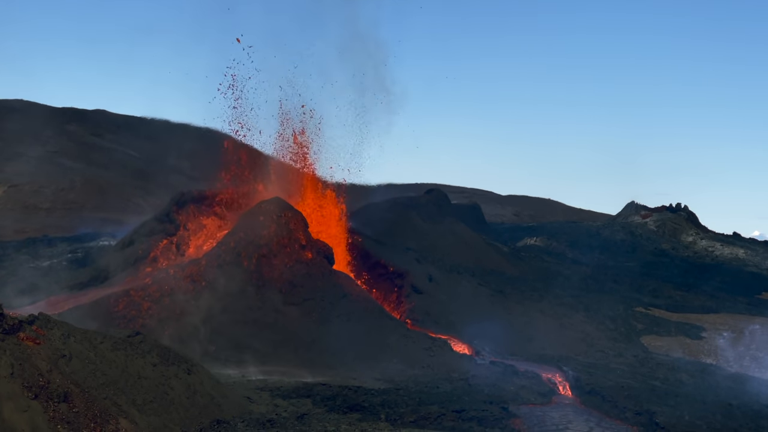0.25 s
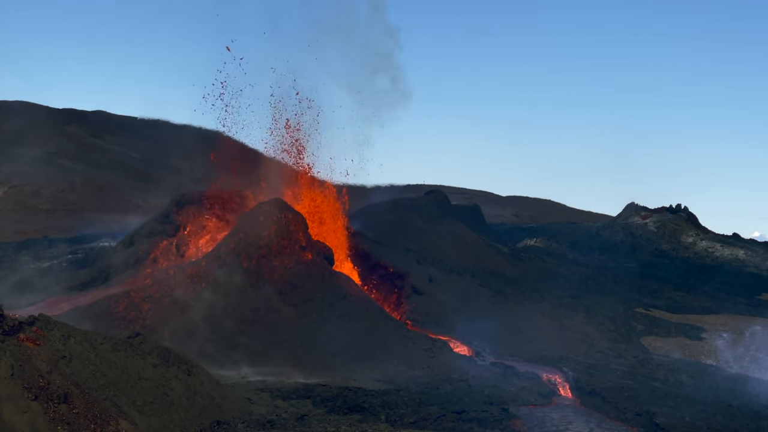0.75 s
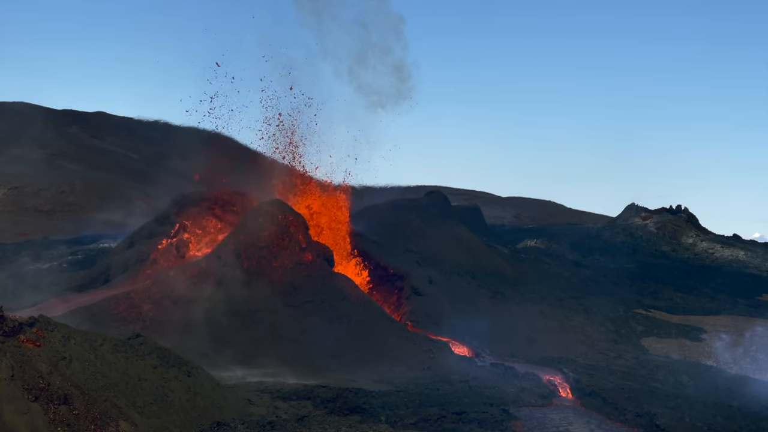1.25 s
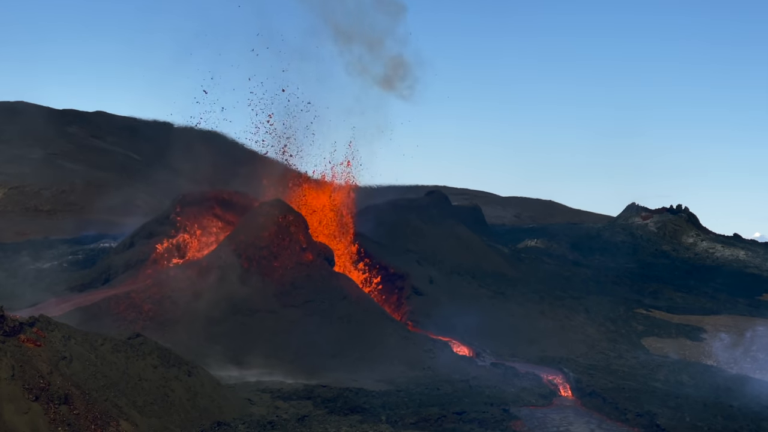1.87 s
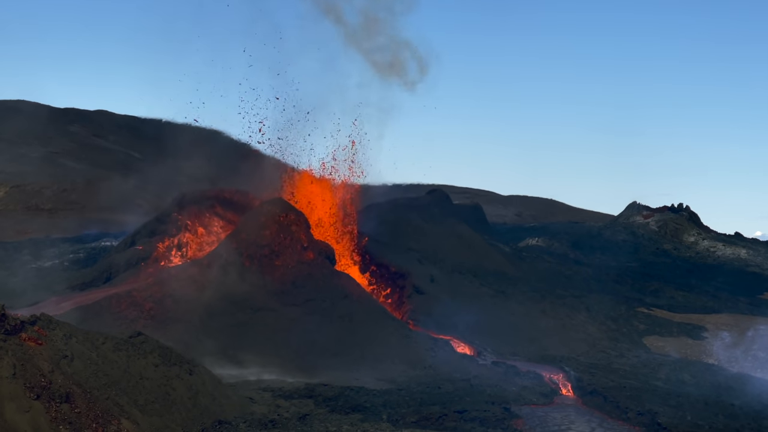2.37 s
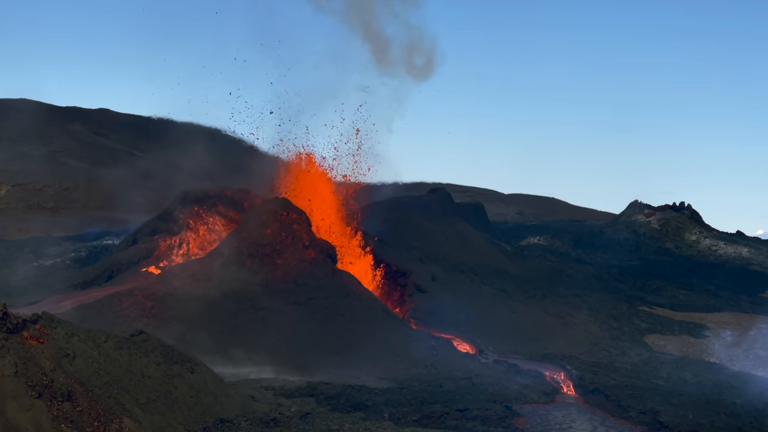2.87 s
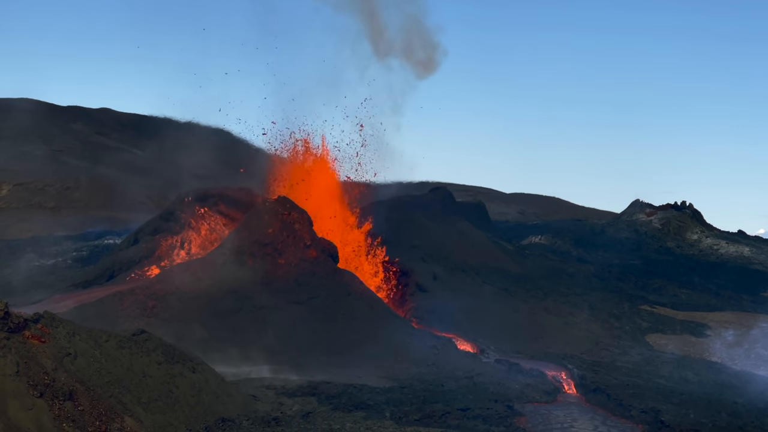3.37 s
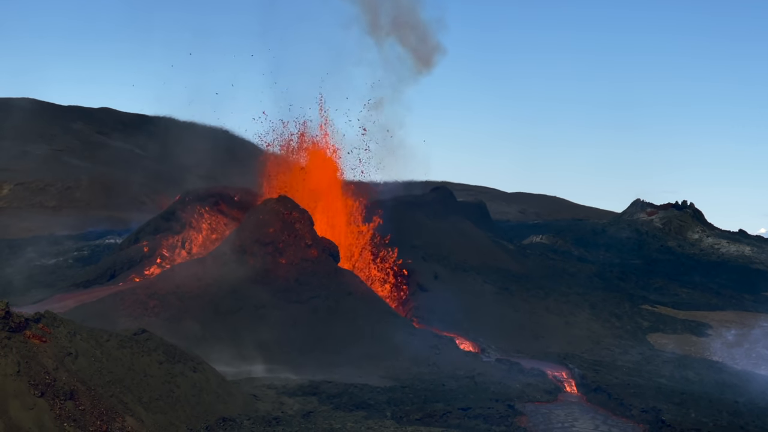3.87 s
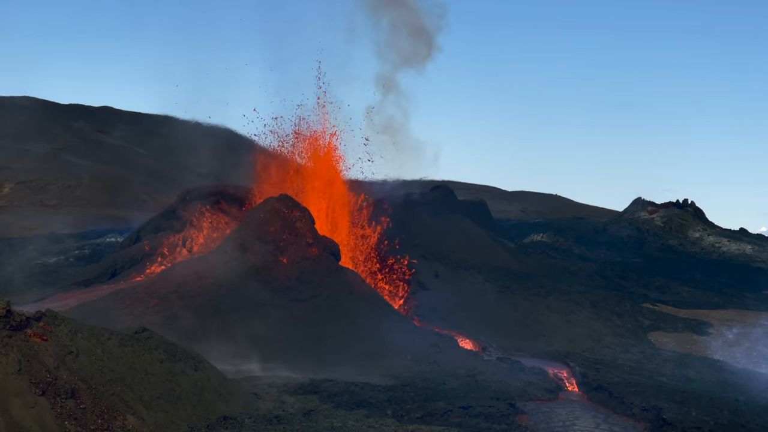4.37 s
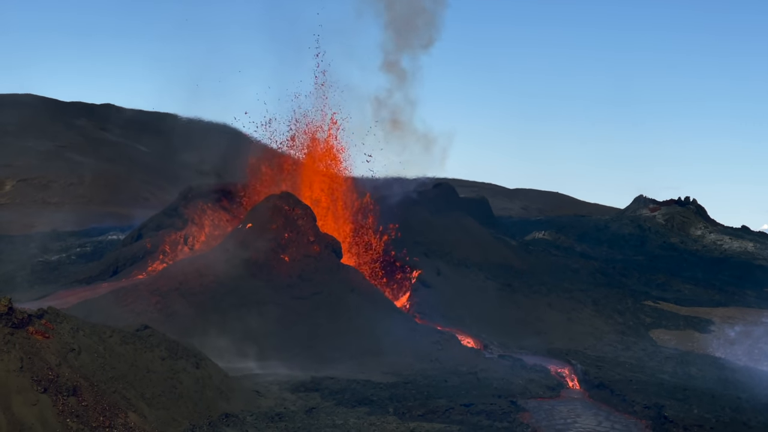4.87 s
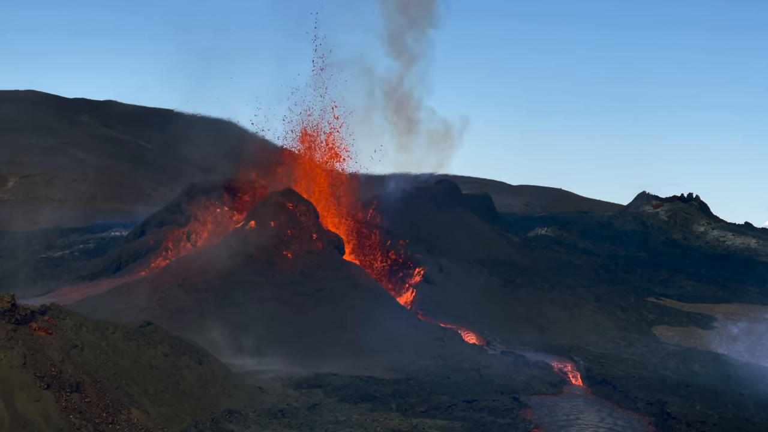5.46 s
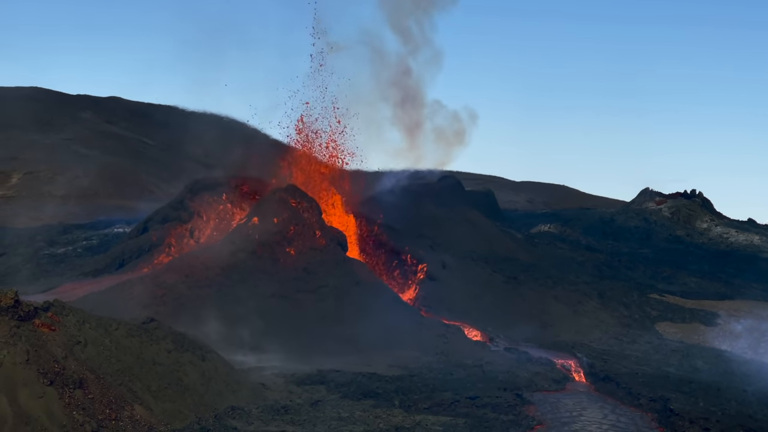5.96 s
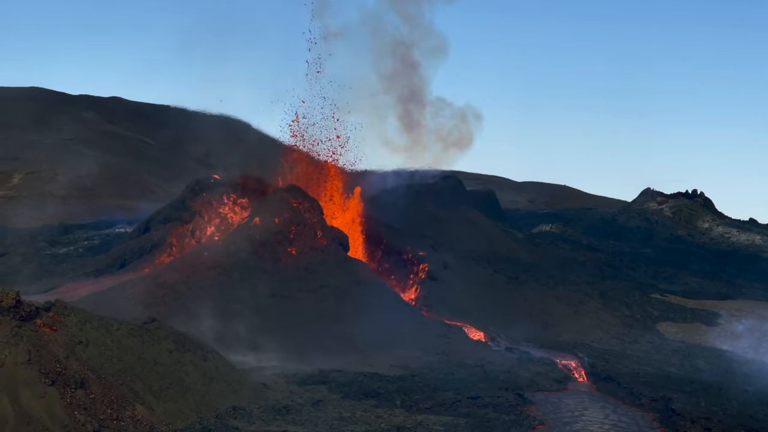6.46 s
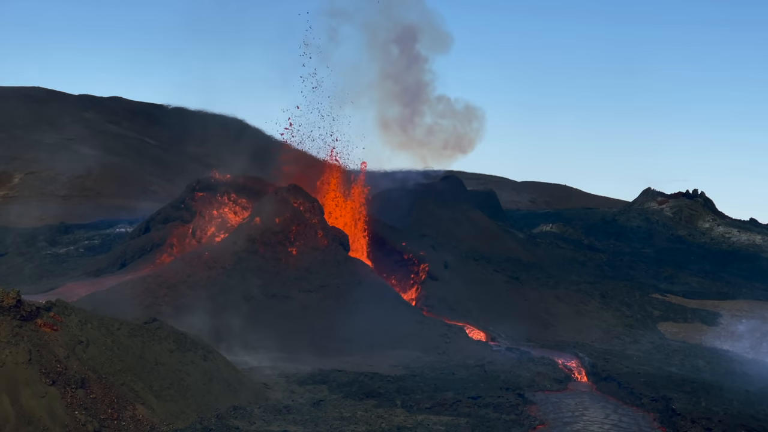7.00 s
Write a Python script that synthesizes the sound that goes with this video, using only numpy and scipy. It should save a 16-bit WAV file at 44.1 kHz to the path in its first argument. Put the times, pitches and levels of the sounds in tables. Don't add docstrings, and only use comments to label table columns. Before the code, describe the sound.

A lava fountain roars continuously from a crater, deep and fluttering, with soft gas thumps and light wind buffeting in open volcanic land.

```python
import sys
import numpy as np
from scipy import signal
from scipy.fft import rfft, irfft, next_fast_len
from scipy.io import wavfile
from scipy.ndimage import uniform_filter1d

SR = 44100
rng = np.random.default_rng(int(sys.argv[2]) if len(sys.argv) > 2 else 0)


def voltage_ratio(level):
    return 10 ** (np.asarray(level, float) / 20)


def store_wav(level_fs):
    pcm = np.round(np.clip(np.atleast_2d(level_fs), -1, 1) * 32767)
    wavfile.write(sys.argv[1], SR, pcm.T.astype(np.int16))


N = 318843
SIZE = next_fast_len(N)
HZ = np.maximum(np.arange(SIZE // 2 + 1) * SR / SIZE, 1)
TIME = np.arange(N) / SR


def level(x, db):
    return x * voltage_ratio(db) / np.sqrt(np.mean(x ** 2))


def colour(points):
    hz, db = np.transpose(points)
    return voltage_ratio(np.interp(np.log(HZ), np.log(hz), db))


def bell(hz, octaves):
    return np.exp(-.5 * (np.log2(HZ / hz) / octaves) ** 2)


def bump(s, spread):
    return np.exp(-.5 * ((TIME - s) / spread) ** 2)


def noise(gain, channels=1):
    return rfft(rng.standard_normal((channels, SIZE))) * gain


def wave(spectrum):
    return irfft(spectrum, SIZE)[..., :N]


def walk(rate):
    hold = int(SR / rate)
    steps = np.repeat(rng.standard_normal(N // hold + 1), hold)
    return 1.3 * uniform_filter1d(uniform_filter1d(steps, hold), hold)[:N]


def pulses(table):
    out = 0
    for s, db, hz, octaves in table:
        pulse = wave(bell(hz, octaves) * np.exp(-2j * np.pi * HZ * s))
        out = out + pulse * voltage_ratio(db) / pulse.max()
    return out


def steadied(x, share, seconds=0.091):
    power = uniform_filter1d(x[0] ** 2, int(seconds * SR))
    return x * (power / power.mean() + .05) ** (-share / 2)


def fountain(flicker_db=0.46, rate=9, shimmer_db=0.57, shimmer_rate=4.5):
    # time in seconds, gas flow in dB, jet speed as brightness in dB per octave,
    # treble carried by the air in dB at air_hz.
    jet_effort = [(0, 0.5, 0, 1.5), (.3, 0.4, -0.3, 2), (.7, -0.66, .5, 1.6), (1.3, -1, .5, 1.4),
                  (1.9, -1.26, -0.14, 2.3), (2.4, -1.6, -0.1, 1.5), (2.8, -0.2, .1, 0.5),
                  (3.25, -0.16, 0, 0.6), (3.6, 0.5, 0.5, -0.6), (4.1, 1.7, 0.27, -1.3),
                  (4.75, 2.5, 0, -3.3), (5.4, 1.8, -0.32, -1.7), (6.1, 0.56, -0.66, -1.1),
                  (6.6, 0.5, -.5, -2.9), (7.23, 2.2, -.5, -3.4)]
    # frequency in Hz, density in dB per Hz.
    roar_colour = [(9, -28), (16, -10), (55, 0), (86, 0.5), (150, -2.5), (225, -10), (380, -10.5),
                   (680, -12), (843, -15), (1030, -16.5), (1650, -26.5), (2210, -36.5), (3160, -54),
                   (4110, -69), (6950, -115)]
    # frequency in Hz, gain in dB.
    slope_colour = [(20, -37), (100, -28.5), (250, -18), (600, -23.5), (1200, -23), (2000, -22),
                    (4000, -17)]
    # time in seconds, change in dB,
    # centre in Hz, spread in seconds.
    surges = [(.12, 3, 90.4, .1), (.42, -10, 49.9, .04), (.52, 5, 44.8, .05), (.8, -5.5, 70, .09),
              (1.0, 5.5, 89.7, .05), (1.34, -5.5, 50.3, .04), (1.45, 1, 800, 0.047), (2.28, -6, 80, .03),
              (2.2, 5, 148.3, .06), (2.55, 3, 89.2, .1), (2.72, -4, 80.4, .05), (3.15, -4, 130, 0.033),
              (3.25, -2.5, 699, 0.078), (3.52, 2.5, 501, 0.043), (3.65, 8, 60, .05),
              (3.83, -4.5, 50.1, 0.045), (3.92, 3.5, 898, 0.054), (4.15, 5, 850, .025),
              (4.24, -7, 69.5, 0.026), (4.39, 3, 50.3, .05), (4.51, -8.5, 110, .04),
              (4.68, 3, 129.4, 0.073), (4.82, -8, 50.1, .04), (5.12, -3, 129.8, 0.046),
              (5.73, -5, 130, .03), (5.86, 3, 120.7, 0.055), (6.45, 3, 676, .12), (6.58, 4.5, 50, .05),
              (7.0, 2.5, 279.6, 0.073), (7.09, 4, 59.6, 0.045)]
    surge_octaves = .7
    pivot_hz, air_hz = 400, 3000

    s, *effort = np.transpose(jet_effort)
    flow_db, bright, air_db = (np.interp(TIME, s, column) for column in effort)
    at, surge_db, surge_hz, spread = np.transpose(surges)
    swells = np.array([bump(*row) for row in zip(at, spread)])
    gas = noise(colour(roar_colour), channels=2) * np.array([HZ ** 0, colour(slope_colour)])
    shimmer = shimmer_db * walk(shimmer_rate)
    out = 0
    for step in range(18):
        hz = 16 * 2 ** (step / 2)
        band = np.maximum(1 - 2 * np.abs(np.log2(HZ / hz)), 0)
        near = surge_db * np.exp(-.5 * (np.log2(hz / surge_hz) / surge_octaves) ** 2)
        jet_db = flow_db + bright * np.log2(hz / pivot_hz)
        treble_db = (air_db + shimmer) * min(hz / air_hz, 1)
        band_db = jet_db + treble_db + near @ swells + flicker_db * walk(rate)
        eddies = steadied(wave(gas * band), np.clip(70 / hz, 0, .6))
        out = out + eddies * voltage_ratio(band_db)
    return level(out, -23.5)


def bursting_slugs():
    # time of the peak in seconds, peak in dB, centre in Hz, width in octaves.
    slug_bursts = [(.409, -22, 600, .7), (.804, -23, 700, .7), (1.767, -22, 600, .7), (2.978, -21, 700, .7),
                   (3.039, -16, 150, .8), (3.67, -14, 80, .8), (3.777, -22, 600, .7), (3.939, -17, 300, .9),
                   (4.163, -17, 250, .9), (4.269, -16, 200, .9), (4.599, -17, 200, .9),
                   (5.819, -21, 600, .7), (6.277, -15, 130, .8), (6.468, -17, 300, .9),
                   (6.575, -15, 150, .9), (7.072, -11, 95, .7)]
    return pulses(slug_bursts)


def ports(direct, scattered):
    # delay in ms, share of the direct sound, centre in Hz, width in octaves.
    rock_echoes = [
        (1.93, -.39, 510, .45),
        (.34, .125, 220, 1.45),
        (5.47, -.11, 288, .57),
        (1.74, -.15, 1100, .27),
        (7.4, .06, 135, .25),
    ]
    right_db = .55
    echo = 0
    for ms, share, hz, octaves in rock_echoes:
        echo = echo + share * bell(hz, octaves) * np.exp(-2j * np.pi * HZ * ms * 1e-3)
    pair = wave(rfft(direct, SIZE) * np.array([1 + echo, 1 - echo]))
    sides = np.array([scattered, -scattered])
    return (pair + sides) * voltage_ratio(np.array([[-right_db], [right_db]]) / 2)


def wind():
    # frequency in Hz, density in dB per Hz.
    wind_colour = [(8, -6), (16, 0), (30, -5), (50, -22), (90, -50), (250, -110)]
    # time in seconds, rise over the lull in dB.
    gusts = [
        (1.4, 5),
        (2, 6.5),
        (2.7, 5),
        (4.45, 7.5),
        (5.05, 9),
        (6, 2),
        (6.599, 2),
    ]
    lull_db, gust_s = -44.5, .2
    flutter = np.array([voltage_ratio(2.5 * walk(4)), voltage_ratio(2.5 * walk(4))])
    buffets = level(flutter * wave(noise(colour(wind_colour), channels=2)), 0)
    gust_db = sum(db * bump(s, gust_s) for s, db in gusts)
    return buffets * voltage_ratio(lull_db + gust_db)


def scene():
    direct, scattered = fountain()
    return ports(direct + bursting_slugs(), scattered) + wind()


def electronics(dry):
    # frequency in Hz, density in dB per Hz.
    hiss_colour = [(30, 2), (1000, 1.5), (4500, 2), (6000, .3), (16000, -1.5), (22000, -3)]
    hiss_db, whine_db, whine_hz = -68.5, -94, 7758
    duck, recover_s = .3, .5
    power = uniform_filter1d(np.mean(dry ** 2, axis=0), int(recover_s * SR))
    gain = (power / power.mean()) ** (-duck / 2)
    hiss = level(wave(noise(colour(hiss_colour), channels=2)), hiss_db) * gain
    whine = np.sqrt(2) * np.sin(2 * np.pi * whine_hz * TIME + 1.2 * walk(12))
    return hiss + whine * voltage_ratio(whine_db)


def limiter_ticks():
    # time of the peak in seconds, peak in dB, centre in Hz, width in octaves.
    snaps = [
        (.1818, -53, 5000, .7),
        (3.9039, -56, 4500, .6),
        (3.9391, -51, 5500, .9),
        (4.1632, -53, 5000, .8),
        (4.5987, -52, 5000, .8),
        (4.694, -53, 4500, .7),
        (6.4678, -52, 5000, .8),
        (6.5747, -54, 5000, .8),
        (7.0719, -55, 12000, .12),
    ]
    return pulses(snaps)


def top_cut(x):
    return signal.sosfilt(signal.butter(12, 15730, fs=SR, output="sos"), x)


def record(dry):
    mix = dry + electronics(dry) + limiter_ticks()
    return top_cut(mix)


dry = scene()
out = record(dry)
store_wav(out)
```